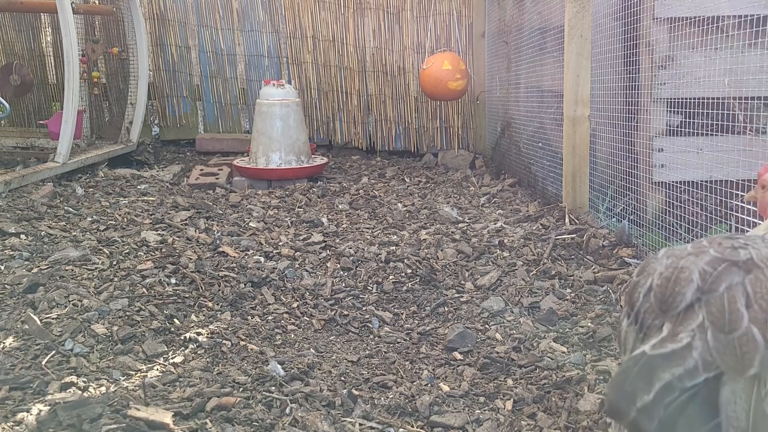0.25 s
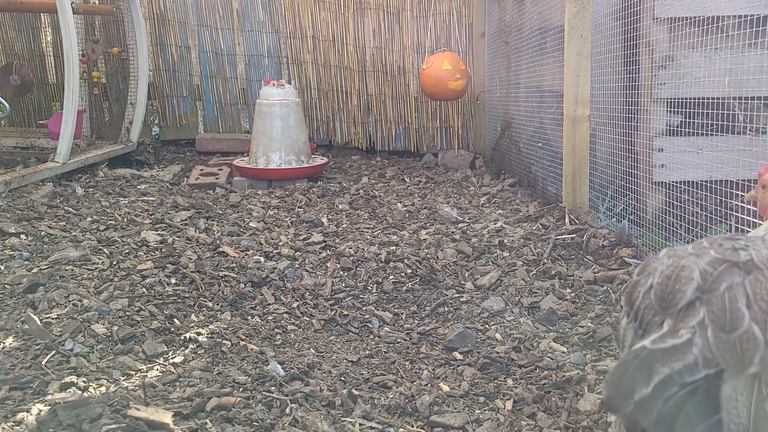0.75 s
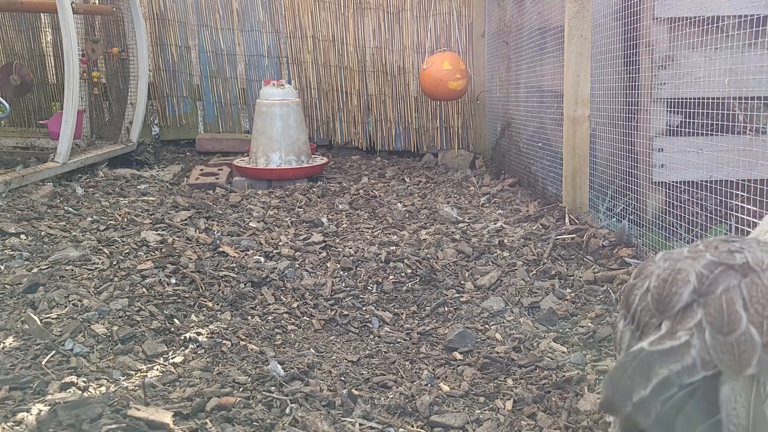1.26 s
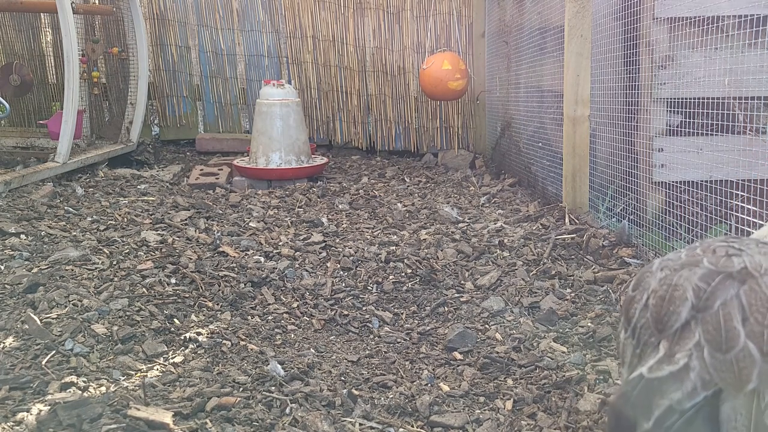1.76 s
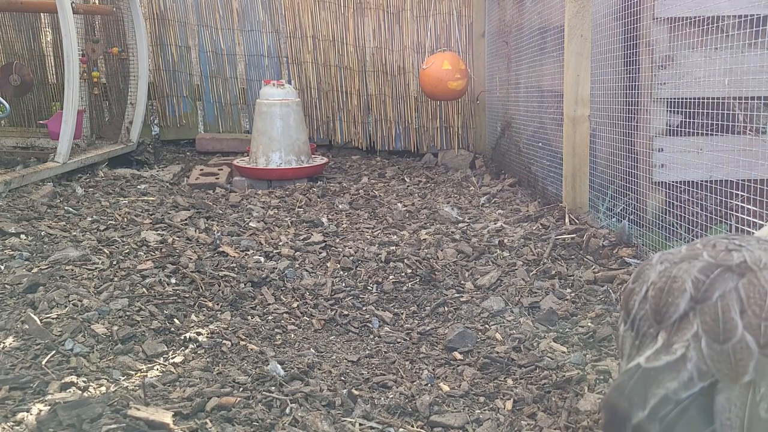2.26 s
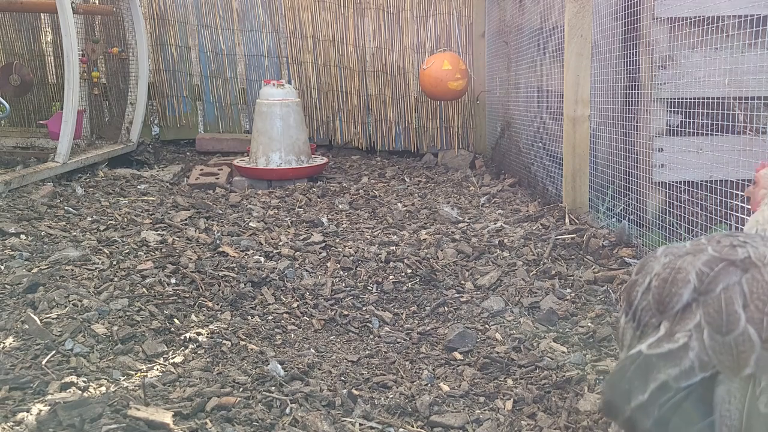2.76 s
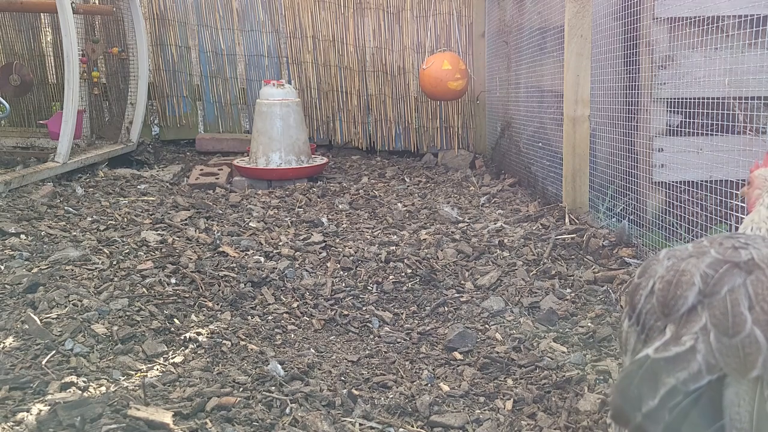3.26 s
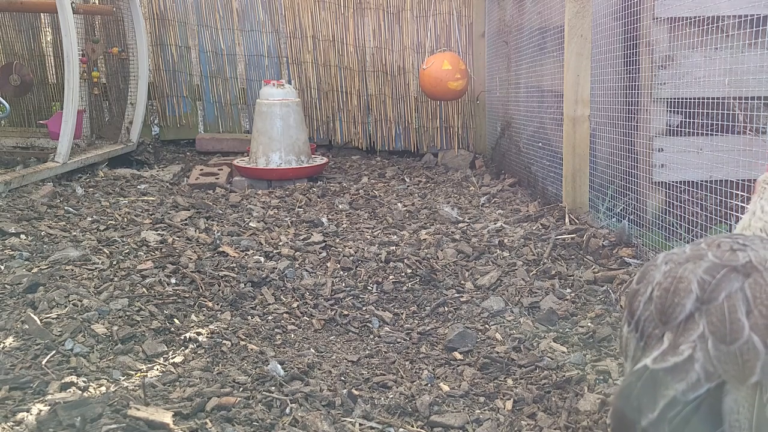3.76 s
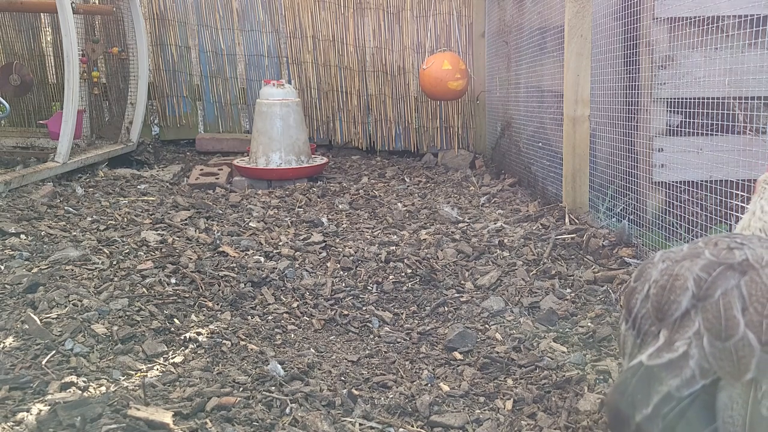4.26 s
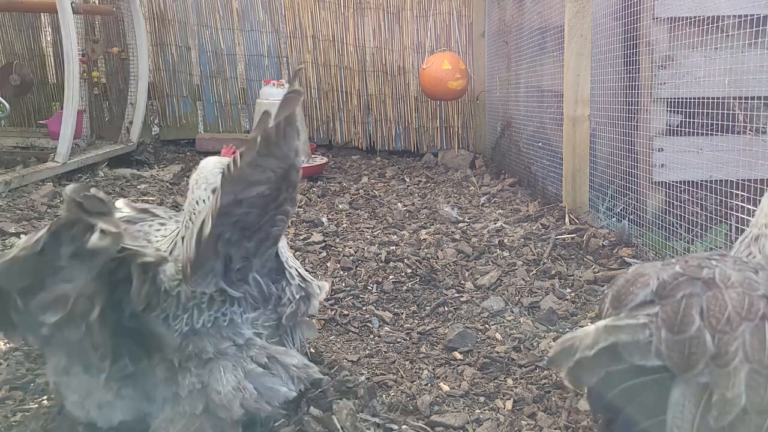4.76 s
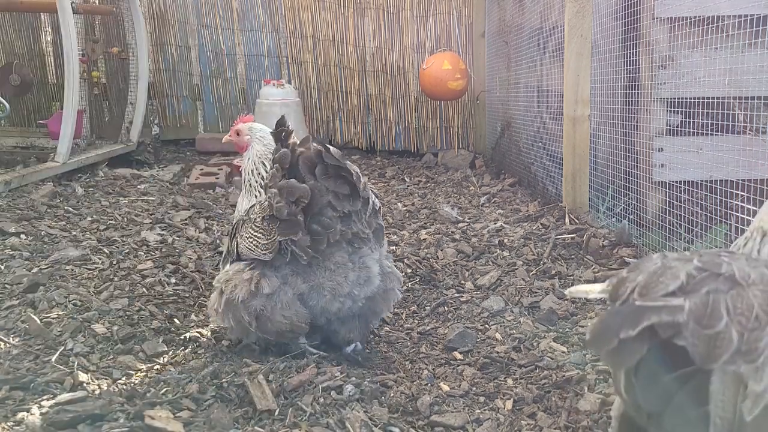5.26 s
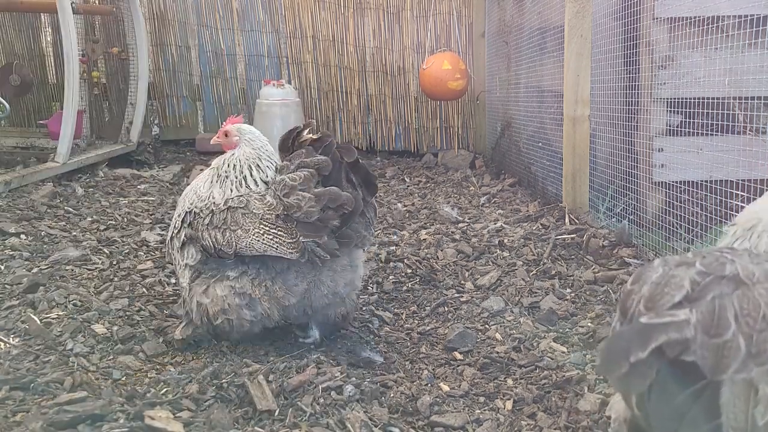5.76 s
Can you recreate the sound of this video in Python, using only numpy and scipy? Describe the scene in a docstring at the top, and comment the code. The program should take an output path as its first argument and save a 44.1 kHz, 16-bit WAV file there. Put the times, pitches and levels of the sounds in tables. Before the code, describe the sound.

Hens whine softly twice, then scratch and peck at wood chips with small, scattered clicks as a feather rustle slowly grows. Near the end comes a loud, close burst of wing flaps, a brief rumble of air on the microphone, and a thudding landing with fading crackles. The phone sits on the ground in an outdoor pen, with a steady electrical hum and faint traffic rumble behind.

```python
"""A fenced hen run with a wood-chip floor, a phone's two microphone ports at ground level.
Behind everything lie a mains hum and distant traffic. A little way off, hens give two thin rising whines,
their feathers rustle and their feet and beaks scuff the chips. Then one flaps past, close on the left:
her wings clap, their draught buffets mainly the right port, and the gain control turns everything down.
Chips snap and the ground thuds as she lands."""
import sys
import numpy as np
from scipy import signal
from scipy.fft import rfft, irfft, next_fast_len
from scipy.io import wavfile
from scipy.ndimage import uniform_filter1d

SR = 44100
rng = np.random.default_rng(int(sys.argv[2]) if len(sys.argv) > 2 else 0)


def bounce(signal):
    """Save signal as a 16-bit WAV file at the path given by the first command-line argument."""
    frames = np.transpose(np.atleast_2d(signal))
    limited = np.clip(frames, -1, 1)
    pcm = np.round(limited * 32767).astype(np.int16)
    wavfile.write(sys.argv[1], SR, pcm)


N = 265482
T = np.arange(N) / SR


def undb(db):
    """Decibels to gain."""
    return 10 ** (np.asarray(db) / 20)


def unit(x):
    """Scale to rms 1."""
    return x / np.sqrt(np.mean(x ** 2))


def bins(size):
    """Frequencies of a real spectrum."""
    return np.arange(size // 2 + 1) * SR / size


def response(points, hz):
    """Gain of a (frequency [Hz], level [dB]) spectrum at the given frequencies."""
    f, db = np.transpose(points)
    return undb(np.interp(np.log(hz + 1), np.log(f), db))


def colour(x, points):
    """Filter by a (frequency [Hz], level [dB]) spectrum."""
    size = next_fast_len(x.shape[-1])
    return irfft(rfft(x, size) * response(points, bins(size)), size)[..., :x.shape[-1]]


def walk(rate_hz):
    """A smooth random wander of rms 1."""
    hold = max(int(SR / rate_hz), 1)
    steps = np.repeat(rng.standard_normal(N // hold + 1), hold)
    return unit(uniform_filter1d(uniform_filter1d(steps, hold), hold)[:N])


def crackle(spread_db, size, grain_samples=24):
    """Half-millisecond grains of unequal strength, shared by both ports but differing in fine detail."""
    grains = undb(spread_db * np.minimum(rng.exponential(size=size // grain_samples + 1), 4))
    return unit(rng.standard_normal((2, size)) * np.repeat(grains, grain_samples)[:size])


def swell(t, rise, fall):
    """Exponential rise to a peak at t = 0, then exponential fall."""
    return np.exp(np.where(t < 0, t / rise, -t / fall))


def held(start, end, attack, release):
    """An envelope that builds up from start, holds until end and dies away."""
    return (1 - np.exp(-np.maximum(T - start, 0) / attack)) * np.exp(-np.maximum(T - end, 0) / release)


def pan(db):
    """Port gains for a level difference, left minus right."""
    return undb(np.array([[db], [-db]]) / 2)


def aim(x, lag_s, direct):
    """Place two unrelated noises off axis: the right port hears the direct share lag_s after the left."""
    delayed = np.roll(x[0], int(round(lag_s * SR)))
    return np.array([x[0], np.sqrt(direct) * delayed + np.sqrt(1 - direct) * x[1]])


def diffuse(points, port_lag_s=.00067):
    """Sound from all around: alike at both ports in the bass, unrelated for waves shorter than their gap."""
    size = next_fast_len(N)
    hz = bins(size)
    likeness = np.sinc(2 * hz * port_lag_s)
    mid, side = rfft(rng.standard_normal((2, size))) * np.sqrt(np.array([1 + likeness, 1 - likeness]) / 2)
    return irfft(np.array([mid + side, mid - side]) * response(points, hz), size)[:, :N]


def fences(x, t60, wet_db, first_echo_s=.0046):
    """Reed screen and boards round the run scatter a short tail, different at each port."""
    t = T[:SR // 2]
    tail = rng.standard_normal((2, len(t))) * np.exp(-np.log(1000) * t / t60) * (t > first_echo_s)
    tail = tail / np.sqrt(np.sum(tail ** 2, axis=1, keepdims=True))
    return x + undb(wet_db) * signal.fftconvolve(x, tail, axes=1)[:, :N]


def mains_hum(waver_db=.72):
    """A mains hum, dead centre, each harmonic wavering a little."""
    # harmonics of the hum: (frequency [Hz], level [dB])
    harmonics = [(100, -43.5), (200, -62.5), (300, -74), (400, -74), (600, -86.5)]
    return sum(undb(db + waver_db * walk(4.5)) * np.sqrt(2) * np.sin(2 * np.pi * (hz * T + rng.random()))
               for hz, db in harmonics)


def traffic(waver_db=1.05):
    """Far traffic arrives from all around as a low rumble, a touch louder on the left."""
    # rumble and the hiss above it: (frequency [Hz], density [dB per Hz])
    rumble = [(15, -100), (30, -81), (50, -71.5), (85, -67.5), (150, -81.5), (250, -86), (400, -94.5),
              (600, -100), (780, -98), (1000, -95), (1400, -102), (2000, -115), (3200, -119), (7000, -121),
              (9000, -114.5), (15000, -116)]
    return diffuse(rumble) * np.sqrt(SR / 2) * undb(waver_db * walk(4.732)) * pan(2)


def faint_hiss(db=-77.5, hold_s=.92, fade_s=.45):
    """A faint mid-pitched hiss around the calls, which holds and then fades."""
    hiss = unit(diffuse([(1000, -10), (1800, 0), (2700, 3.5), (3500, -16.5), (8000, -30)]))
    return hiss * undb(db) * np.exp(-np.maximum(T - hold_s, 0) / fade_s)


def rustle(grain_db=2.5, flicker_db=1.7):
    """Right of centre, a hen shifts and her body feathers slide with a fine, uneven hiss."""
    # her shuffles: (time [s], level [dB], rise [s], fall [s])
    shuffles = [(.8, -77, 0.27, .35), (2.93, -66.5, 0.096, 0.13), (3.15, -64, 0.1, 0.4),
                (3.62, -62, 0.1, 0.21), (3.99, -64, 0.21, 0.2), (4.45, -57, 0.152, .1),
                (4.88, -49, 0.03, 0.2), (5.7, -69.5, 0.21, 0.8)]
    # hiss of soft feathers: (frequency [Hz], level [dB])
    down = [(800, -14), (2500, -10), (3500, -8.5), (5200, -2), (7000, 1), (9500, -5.5), (15000, -4)]
    strength = np.sqrt(sum((undb(db) * swell(T - s, rise, fall)) ** 2 for s, db, rise, fall in shuffles))
    return unit(colour(crackle(grain_db, N), down)) * strength * undb(flicker_db * walk(45)) * pan(-3.5)


def scuffs(grain_db=1, ring_db=9.5, ring_width=.15, upper_ratio=1.68, neighbours_db=2, dull_db=4):
    """Bursts of tiny fractures: the struck chip rings in two broad modes, its neighbours at random."""
    # feet and beaks in the chips: (time [s], level [dB], rise [s], ring [Hz], low body [dB])
    scrapes = [(.633, -42, .004, 7600, 0.5), (.637, -43, .004, 1950, 7.5), (0.839, -67.5, .008, 5600, 4),
               (1.045, -60.5, .022, 7200, -7), (1.283, -55.5, .007, 2310, 1.5),
               (1.402, -64.5, .0034, 7850, -10), (1.925, -68, 0.026, 4900, 5), (2.044, -65, .008, 4800, 7),
               (2.177, -57, 0.0091, 7140, -8), (2.637, -52.5, .005, 4940, 0.5), (2.655, -56, .006, 6800, 0),
               (3.364, -61.5, 0.0059, 7160, -22), (3.483, -44, 0.0053, 3770, -2.5),
               (3.644, -50, 0.0037, 2270, 3), (3.662, -52.5, 0.0042, 4450, 6),
               (3.749, -50, 0.0046, 4600, -30), (3.825, -48.5, .0005, 5800, -18),
               (3.85, -58, .005, 6500, -8), (4.06, -69, 0.049, 4030, 9), (4.283, -58, 0.0057, 2900, -5),
               (4.341, -42.5, 0.005, 3070, -3), (4.394, -43, 0.0064, 2090, -2.5),
               (5.142, -50.5, 0.0062, 3480, -15.5), (5.181, -55, 0.0044, 7400, -17),
               (5.98, -62.5, .006, 7200, -15)]
    # dry wood chips: (frequency [Hz], level [dB])
    chips = [(150, 4), (400, 11.5), (900, 2.5), (2000, 3), (4000, -3.5), (7000, -3.5), (10000, -6.5),
             (15000, -7.5)]
    size = 16384
    out, hz = np.zeros((2, N + 2 * size)), bins(size)
    t = (np.arange(size) - size // 2) / SR
    for s, db, rise, ring_hz, body_db in scrapes:
        lower, upper = (1 / (1 + ((hz / f - 1) / ring_width) ** 2) for f in (ring_hz, ring_hz * upper_ratio))
        upper_db = 6.5 + 5 * np.log2(ring_hz / 4000)  # small, high chips have the stronger upper mode
        neighbours = signal.resample(rng.standard_normal(64), len(hz))
        shape_db = ring_db * lower + upper_db * upper + neighbours_db * neighbours
        shape_db += body_db / (1 + (2 * hz / ring_hz) ** 4)
        shape_db -= dull_db / (1 + (3 * ring_hz / (hz + 1)) ** 4)  # big, low chips give little treble
        burst = unit(irfft(rfft(crackle(grain_db, size)) * response(chips, hz) * undb(shape_db)))
        fall = .009 + .7 * rise  # a slower scrape also takes longer to die away
        start = int(s * SR) + size // 2
        out[:, start:start + size] += burst * swell(t, rise, fall) * undb(db)
    return out[:, size:size + N] * pan(-1.3)


def whine(start, end, note_hz, climb, warble_rate, db, attack, octave_db, roughness, lag_s, pan_db):
    """A nearly pure syrinx tone with a nasal edge: it warbles, steadies, climbs and flips up hoarsely."""
    # the voice slips off its note and back, or flips up at the end: (time [s], step [Hz], half length [s])
    slips = [(0.195, 359, 0.031), (0.731, 115, .028), (0.84, -30.5, 0.014), (1.081, 26.5, .04),
             (1.34, 135, .036), (1.453, 335, .015)]
    # the throat's gain for the second harmonic: (frequency [Hz], gain [dB])
    octave = [(1490, -1), (1560, -5.5), (1640, -8), (1740, -16), (1900, -12), (2300, -23)]
    # its gain for the upper overtones: (frequency [Hz], gain [dB])
    throat = [(2200, -31), (2500, -22.5), (2800, -41), (3300, -50), (4150, -40), (4400, -28), (4900, -46),
              (7000, -43)]
    warble_depth_hz, settle_s, break_hz_per_s = 23.6, .38, 9000
    jitter, shimmer_db, rasp_db, edge_db = .022, 1.9, -6, -1
    press_db_per_s, slip_db_per_hz, warble_db_per_hz = 5.5, -.0107, -.0756
    age = np.clip(T, start, end) - start
    warble = -warble_depth_hz * np.sin(2 * np.pi * warble_rate * age) * np.exp(-(age / settle_s) ** 2)
    slip = sum(step_hz * np.exp(-((T - s) / half) ** 2) for s, step_hz, half in slips)
    hoarse = roughness * (1 + np.tanh(np.abs(np.gradient(slip, T)) / break_hz_per_s))
    hz = (note_hz + climb * age + warble + slip) * (1 + jitter * hoarse * walk(260))
    phase = 2 * np.pi * np.cumsum(hz) / SR
    octave_gain = undb(octave_db) * response(octave, 2 * hz)
    edge = undb(edge_db) * sum(response(throat, k * hz) * np.sin(k * phase) for k in range(3, 8))
    tone = np.sqrt(2) * (np.sin(phase) + octave_gain * np.sin(2 * phase) + edge)
    # she presses harder as she goes on; the voice is weaker above its note and louder below it
    level_db = db + press_db_per_s * age + slip_db_per_hz * slip + warble_db_per_hz * warble
    voice = tone * held(start, end, attack, release=.0075) * undb(level_db + shimmer_db * walk(130))
    voice *= 1 + undb(rasp_db) * hoarse * np.sqrt(octave_gain) * walk(900)
    # she stands off to one side, so one port hears her later
    return np.array([np.interp(T - lag_s, T, voice), voice]) * pan(pan_db)


def calls():
    """Two whines, the first from the left, the second just right of centre."""
    # whines: (start [s], end [s], pitch [Hz], climb [Hz/s], warble rate [Hz], base level [dB], attack [s],
    # octave [dB], roughness [0-1], left port's delay [s], left minus right [dB])
    whines = [(-.025, 0.205, 747.4, 250, 8.15, -54.5, 0.019, 3, 0.47, -.0003, 6.5),
              (0.736, 1.462, 792, 67.9, 12.13, -54.5, 0.068, -1.4, 0.36, .00025, -1)]
    return sum(whine(*row) for row in whines)


def thuds(rise_s=.0029, fall_s=.01):
    """A planted foot shakes the ground under the phone for a few cycles."""
    # soft footfalls: (time [s], level [dB], pitch [Hz])
    footfalls = [(0.643, -37, 75), (3.661, -28.5, 73.6), (5.146, -21, 83), (5.186, -31.5, 71)]
    return sum(undb(db) * swell(T - s, rise_s, fall_s) * np.sin(2 * np.pi * hz * (T - s))
               for s, db, hz in footfalls)


def snaps(rise_s=.00078, fall_s=.0021):
    """Single chips crack sharply near the phone as the hen steps and lands."""
    # chips snapping underfoot: (time [s], level [dB], left minus right [dB])
    cracks = [(0.6362, -36, 1), (4.925, -36, 4.5), (5.025, -36.5, 0), (5.104, -41.5, -3), (5.148, -39.5, 4),
              (5.267, -46, -5), (5.404, -55, -10), (5.533, -57, -11.5), (5.608, -51, -8), (5.693, -62, -11)]
    strength = sum(undb(db) * pan(pan_db) * swell(T - s, rise_s, fall_s) for s, db, pan_db in cracks)
    bright = colour(rng.standard_normal((2, N)), [(800, -9), (3200, -7), (7000, 3.5), (15000, .5)])
    return strength * unit(bright)


def wings(grain_db=3, lag_s=.00042, stroke_fall_s=.03, clap_rise_s=.0011):
    """Close on the left, each stroke rattles the quills, swishes their tips and pushes air; some clap."""
    # wing strokes: (time [s], level [dB], rise [s])
    strokes = [(4.447, -44, .014), (4.561, -37.5, 0.036), (4.627, -35.5, .016), (4.664, -33.5, .013),
               (4.723, -34, 0.0033), (4.747, -34, .008)]
    # flight feathers clapping together: (time [s], level [dB], fall [s], tips relative to quills [dB])
    claps = [(4.497, -32, .006, 3), (4.645, -24.5, 0.0068, -11.5), (4.746, -14, .0027, -4.5)]
    # stiff flight feathers, the air they push and the hiss of their tips: (frequency [Hz], level [dB])
    quill_spectrum = [(300, -9), (1000, 1), (1500, -7.5), (2200, 0), (2900, -2.5), (3800, 0.5), (7000, -2),
                      (9000, -3), (15000, -5)]
    air_spectrum = [(20, -11), (50, 7), (85, 4), (160, -7), (400, -7.5), (650, -12.5), (1000, -15),
                    (1500, -21.5), (4000, -55.5)]
    tip_spectrum = [(2000, -26.5), (6000, -6), (9000, 0), (14000, -1.5)]
    power = 0  # one row each for quills, air and tips
    for s, db, rise in strokes:
        force_db = db + 38  # relative to a middling stroke
        air_db = db + 6.5 + .49 * force_db  # a harder stroke pushes far more air
        tips_db = db - 2 - .9 * force_db  # but its tips hiss hardly any louder
        power += (undb([[db], [air_db], [tips_db]]) * swell(T - s, rise, stroke_fall_s)) ** 2
    for s, db, fall, hiss_db in claps:
        power += (undb([[db], [db - 4], [db + hiss_db]]) * swell(T - s, clap_rise_s, fall)) ** 2
    quills = aim(unit(colour(crackle(grain_db, N), quill_spectrum)), lag_s, direct=.088)
    air = aim(unit(colour(rng.standard_normal((2, N)), air_spectrum)), lag_s, direct=.92)
    tips = unit(colour(crackle(grain_db, N), tip_spectrum))
    return sum(np.sqrt(p) * layer for p, layer in zip(power, (quills, air, tips)))


def draught(steady_s=.025, fine_db=-14, arch_power=.83):
    """Eddies off the wings beat on each port separately; the hardest gusts break up into finer ones."""
    # gusts on the ports, each one arch: (start [s], end [s], left [dB], right [dB])
    gusts = [(4.871, 4.943, -24.5, -2), (4.917, 5.018, -40, -14.5), (4.996, 5.056, -40, -5.5)]
    # the large and the fine eddies: (frequency [Hz], level [dB])
    large_spectrum = [(18, -33), (36, -11), (55, 3), (90, 3), (125, -5), (185, -5), (280, -16.5),
                      (500, -33), (800, -49), (2000, -72)]
    fine_spectrum = [(120, -24), (280, 2), (560, -11), (950, -30), (2200, -55.5)]
    force = 0
    for start, end, left_db, right_db in gusts:
        arch = np.abs(np.sin(np.pi * np.clip((T - start) / (end - start), 0, 1))) ** arch_power
        force = np.maximum(force, undb([[left_db], [right_db]]) * arch)
    large = colour(rng.standard_normal((2, N)), large_spectrum)
    # evened out, so that the push of the wing sets their strength from moment to moment
    window = int(steady_s * SR)
    large /= np.sqrt(uniform_filter1d(uniform_filter1d(large ** 2, window), window // 2))
    fine = unit(colour(rng.standard_normal((2, N)), fine_spectrum))
    return large * force + fine * force ** 2 * undb(fine_db)


def scene():
    """The hens inside the fences, the draught on the phone and the world outside."""
    voices = fences(calls(), t60=.2, wet_db=-13)
    feet = aim(scuffs(), lag_s=-.0003, direct=.068)
    further_off = fences(feet + rustle(), t60=.25, wet_db=-8.5)
    # the flapping hen is right by the phone, so she sounds drier than the scuffing
    close_by = fences(wings() + snaps(), t60=.3, wet_db=-10)
    return voices + further_off + close_by + thuds() + draught() + mains_hum() + traffic() + faint_hiss()


def record(dry, threshold_db=-19, slope=.31, creep_db_per_s=.1, top_hz=15900):
    """The phone's gain control ducks at once and stays down; peaks are rounded and the top is cut."""
    # the microphone's response: (frequency [Hz], gain [dB])
    microphone = [(7400, 0), (8400, -8.5), (15000, -6)]
    x = colour(dry, microphone)
    power = uniform_filter1d(np.max(x ** 2, axis=0), size=900)
    over_db = np.maximum(10 * np.log10(np.abs(power) + 1e-12) - threshold_db, 0)
    creep_db = creep_db_per_s * T  # between ducks the gain keeps sinking very slowly
    duck_db = np.maximum.accumulate(slope * over_db - creep_db) + creep_db
    rounded = np.tanh(x * undb(-duck_db))
    return signal.sosfilt(signal.ellip(10, .2, 70, top_hz, fs=SR, output="sos"), rounded)


dry = scene()
out = record(dry)
bounce(out)
```